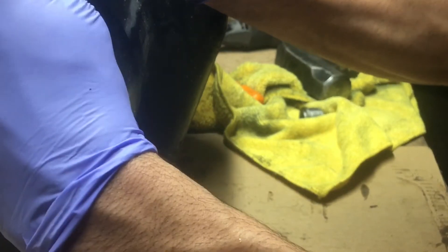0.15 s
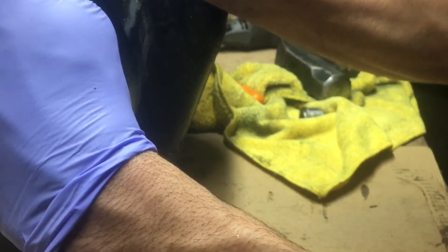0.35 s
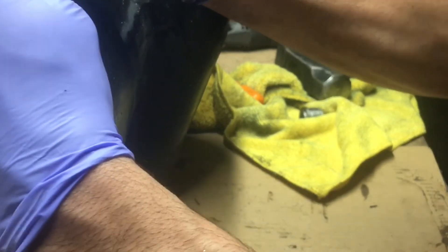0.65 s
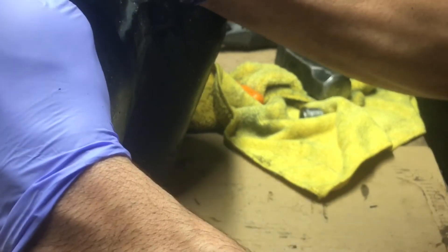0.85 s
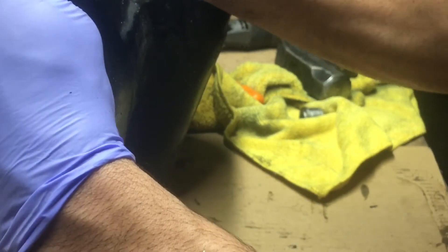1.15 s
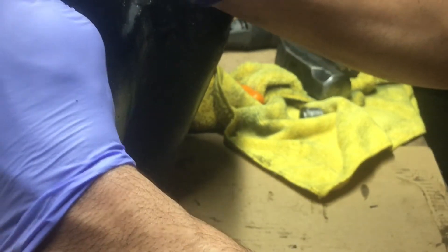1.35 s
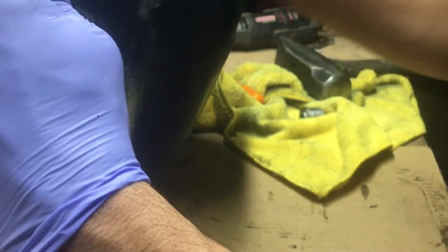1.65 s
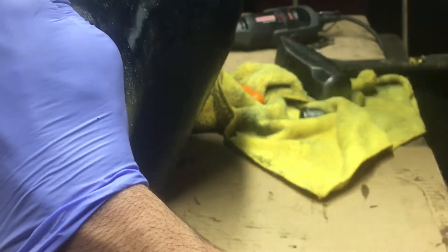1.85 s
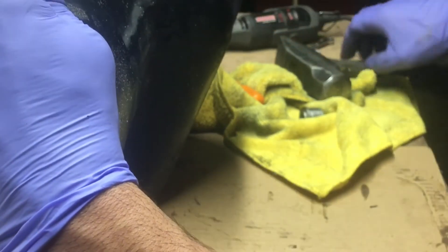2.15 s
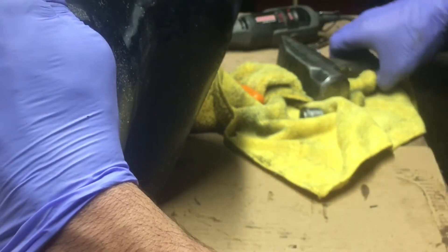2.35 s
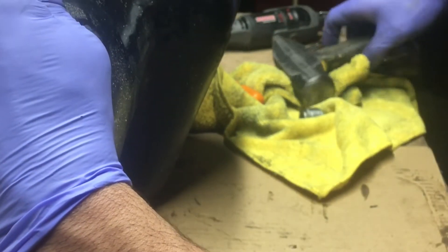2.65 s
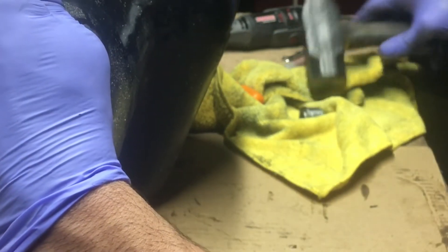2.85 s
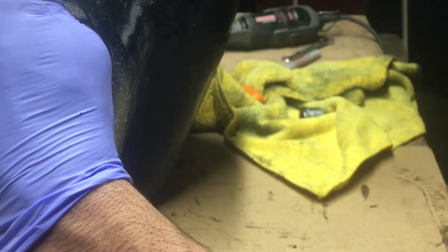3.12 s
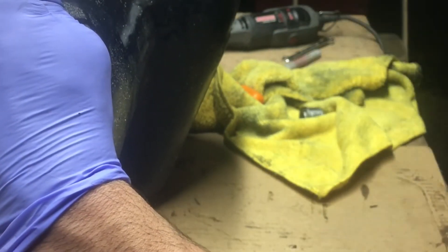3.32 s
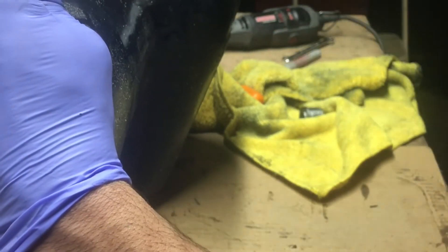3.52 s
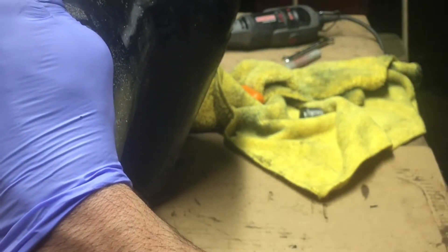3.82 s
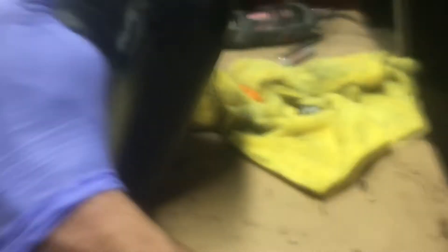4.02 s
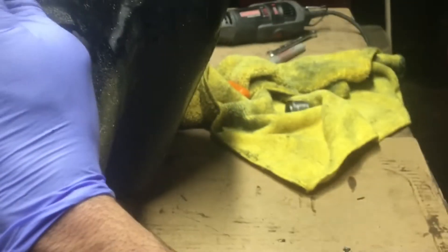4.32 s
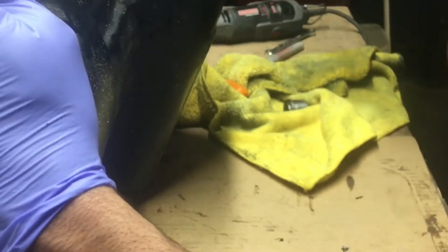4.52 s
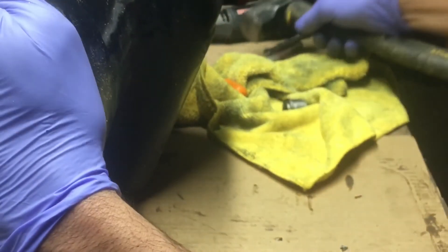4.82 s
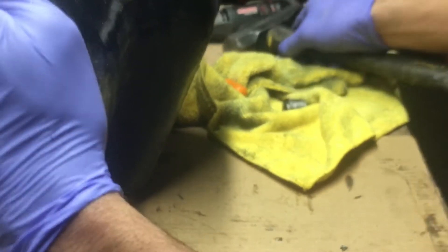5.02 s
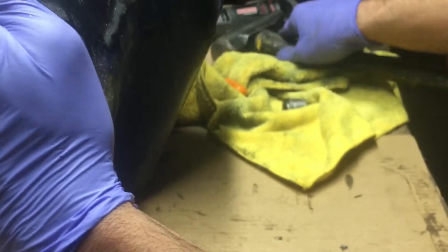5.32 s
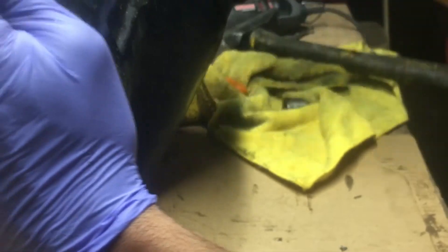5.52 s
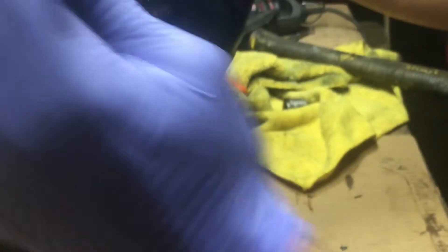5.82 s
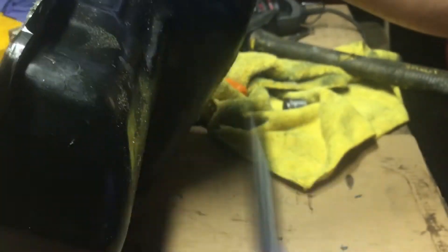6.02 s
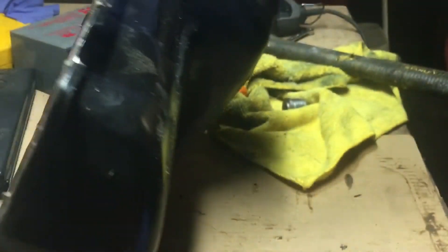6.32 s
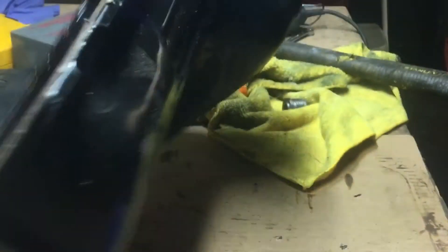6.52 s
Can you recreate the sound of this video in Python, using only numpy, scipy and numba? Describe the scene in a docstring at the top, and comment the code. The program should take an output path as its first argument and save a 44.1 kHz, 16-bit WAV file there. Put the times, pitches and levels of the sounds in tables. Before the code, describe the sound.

Faint rubbery rustles over low shop rumble, a sudden loud metallic crash with short ring, then heavy tool clacks, scrapes and bench thumps.

```python
"""A steel oil pan on a workshop bench, heard close by: one hard hammer blow rings its decaying modes.
Gloved hands shift a punch on it before; then the hammer is laid down and pan and tools knock about.
Impacts are sums of damped sines and banded noise; scrapes and rustling are noise under moving gains.
A filtered-noise rumble fills the shop and the walls echo the bench.
The phone turns down after loud sounds and limits the peaks."""
import sys
import numpy as np
from scipy import signal
from scipy.fft import rfft, irfft, next_fast_len
from scipy.io import wavfile
from scipy.ndimage import uniform_filter1d
from numba import njit

SR = 44100
rng = np.random.default_rng(int(sys.argv[2]) if len(sys.argv) > 2 else 0)


def store_wav(level_fs):
    """Save 16-bit WAV to argv[1]."""
    pcm = np.round(np.clip(np.atleast_2d(level_fs), -1, 1) * 32767)
    wavfile.write(sys.argv[1], SR, pcm.T.astype(np.int16))


N = 293617


def undb(db):
    """Logarithmic level: decibels to amplitude gain."""
    return 10 ** (np.asarray(db) / 20)


def level(x, db):
    """Mean power: scale a signal to an rms level."""
    return x * undb(db) / np.sqrt(np.mean(x ** 2))


def peak(x, db):
    """Peak amplitude: scale a signal to a peak level."""
    return x * undb(db) / np.max(np.abs(x))


def unit_energy(x):
    """Energy normalization: scale the sum of squares to 1."""
    return x / np.sqrt(np.sum(x ** 2))


def add(out, s, sound):
    """Superposition: mix a sound in at a time in seconds."""
    i = int(s * SR)
    out[i:i + len(sound)] += sound[:N - i]


def spectrum_bins(size):
    """Discrete spectrum: bin frequencies in Hz, at least 1 so that logarithms exist."""
    return np.maximum(np.arange(size // 2 + 1) * SR / size, 1)


def coloured(x, points):
    """Linear filtering: shape a spectrum by (frequency [Hz], gain [dB]) points."""
    hz, db = np.transpose(points)
    size = next_fast_len(len(x))
    gain = undb(np.interp(np.log(spectrum_bins(size)), np.log(hz), db))
    return irfft(rfft(x, size) * gain, size)[:len(x)]


def walk(rate):
    """Random modulation: levels held 1 / rate seconds, smoothed twice, with a spread near 1."""
    k = int(SR / rate)
    steps = np.repeat(rng.standard_normal(N // k + 1), k)
    return 1.3 * uniform_filter1d(uniform_filter1d(steps, k), k)[:N]


def stroke(s, db, rise_s, hold_s, fall_s):
    """Exponential envelope: a movement's gain swells, holds and dies away evenly in dB."""
    t = np.arange(N) / SR - s
    # distance from full contact, in steps of 20 dB; times below 1 ms act as 1 ms
    before = np.maximum(-t / max(rise_s, 1e-3), 0)
    after = np.maximum((t - hold_s) / max(fall_s, 1e-3), 0)
    return undb(db - 20 * np.minimum(before + after, 10))


def favour(f, hz, octaves):
    """Contact spectrum: a contact drives the frequencies near hz best (dB)."""
    return -6 * (np.log2(f / hz) / octaves) ** 2


def ring(modes, hz, octaves, free, scatter_db, seconds):
    """Modal superposition: damped sines of total energy 1, at new strengths for each blow."""
    f, db, t60 = np.transpose(modes)[:, :, None]
    chance = rng.standard_normal((len(f), 2, 1))
    gain = undb(db + scatter_db * chance[:, 0] + favour(f, hz, octaves))
    polarity = np.sign(chance[:, 1])
    t = np.arange(int(seconds * SR)) / SR
    decay = np.exp(-np.log(1000) * t / (t60 * free))
    return unit_energy(np.sum(gain * polarity * np.sin(2 * np.pi * f * t) * decay, axis=0))


# centres of the overlapping decay bands [Hz], 0.6 octave apart
BANDS_HZ = 50 * 2 ** np.arange(0, 8.4, .6)[:, None]


def crowd(points, hz, octaves, free, seconds):
    """High modal density: noise of energy 1 whose narrow bands each die at their own rate."""
    size = next_fast_len(int(seconds * SR))
    f, db, t60 = np.transpose(points)
    bins = spectrum_bins(size)
    strength = np.interp(np.log(bins), np.log(f), db, left=-60) + favour(bins, hz, octaves)
    noise = rfft(rng.standard_normal(size)) * undb(strength)
    masks = np.clip(1 - np.abs(np.log2(bins / BANDS_HZ)) / .6, 0, 1)
    t60_s = np.interp(np.log(BANDS_HZ), np.log(f), t60) * free
    decay = np.exp(-np.log(1000) * np.arange(size) / SR / t60_s)
    return unit_energy(np.sum(irfft(noise * masks, size) * decay, axis=0)[:int(seconds * SR)])


@njit
def limiter(x, top, ratio, attack, release, ahead):
    """Dynamic compression: an envelope follower lowers the gain above a threshold.

    Attack and release are the follower's shares per sample; ahead is in samples.
    """
    y, e = np.empty(len(x)), 1e-9
    for i in range(len(x)):
        a = abs(x[min(i + ahead, len(x) - 1)])
        e += (a - e) * (attack if a > e else release)
        y[i] = x[i] * min(1., top / e) ** (1 - 1 / ratio)
    return y


# background spectrum: (frequency [Hz], relative level per Hz [dB])
SHOP_SPECTRUM = [(12, -41), (20, -7), (81, 2), (124, -6.5), (163, -5), (188, -9.5), (210, -17),
                 (311, -23.5), (339, -24.5), (928, -31), (2280, -42), (2550, -49.5), (7380, -52.5),
                 (9500, -51), (16200, -72)]
SHOP_DB = -45.5  # rms


def shop():
    """Stationary noise, slightly modulated: steady rumble and faint hiss, swelling a little."""
    rumble = coloured(rng.standard_normal(N), SHOP_SPECTRUM)
    return level(rumble * undb(1.2 * walk(3)), SHOP_DB)


# reverberation of the walls: (frequency [Hz], relative level [dB], t60 before scaling [s])
ROOM_DECAY = [(63.5, 14, 0.35), (247, 4.5, 0.64), (950, 0, 0.67), (3060, -6, 0.79), (7820, -10, 0.97),
              (15000, -4, 0.11)]
ROOM_DB, ROOM_DELAY_S = -13, .004


def echo(near):
    """Diffuse reverberation: convolve the bench with delayed, decaying noise from the walls."""
    tail = crowd(ROOM_DECAY, 1000, 20, 0.82, 0.92)
    walls = np.append(np.zeros(int(ROOM_DELAY_S * SR)), tail)
    return undb(ROOM_DB) * signal.fftconvolve(near, walls)[:N]


# spectrum of rubbing gloves and rag: (frequency [Hz], relative level per Hz [dB])
CLOTH_SPECTRUM = [(880, -47), (1500, -8), (2940, -5.5), (3880, 0), (4870, -8), (5330, -2.5), (11200, -6),
                  (16000, -11)]
# movements of gloves and rag: (time of the loudest moment [s], level [dB], 20 dB rise time [s],
# 20 dB fall time [s], treble gain [dB]); times too short, or negative, are raised to a minimum
RUSTLE_MOVES = [(.06, -75, -0.1, 0.4, 0), (.31, -65.5, 0, -0.03, -12), (0.472, -40.5, 0.0357, 0.1043, -2.5),
                (.82, -66.5, 0.07, 0.03, -14), (1.26, -52.5, 0.07, 0.15, -2), (1.38, -63.5, 0.03, -0.17, 3),
                (1.63, -68.5, 0.48, 0, 2), (1.76, -68, 0, 0.37, -2), (1.86, -67, -0.1, 0, -3),
                (1.93, -68, -0.04, 0, 0), (2.09, -65, -0.06, 0.18, 0), (2.295, -63.5, -0.1, 0.2, 4),
                (2.57, -65.5, 0.07, 0.16, 0), (2.72, -65, 0.33, 0.2, -3), (3.07, -55.5, 0.08, 0.16, 4),
                (3.205, -54.5, 0.06, 0.13, 0), (4.52, -62.5, -0.02, 0.2, -8.5),
                (4.664, -62, 0.04, -0.25, -8.5), (4.73, -67, -0.16, 0.5, -8), (4.9, -49, 0.06, -0.14, -7),
                (5.06, -53, 0.15, -0.04, -2), (5.296, -54, 0.26, 0.1, -5.5), (5.41, -65, 0.07, 0.4, 2),
                (5.552, -36.5, 0.0445, 0.02, -21), (5.71, -54, -0.26, -0.06, -6),
                (5.768, -58, -0.24, 0.13, -12), (5.82, -52, 0.08, 0.1, 0), (6.0, -70.5, -0.2, .8, -7.5),
                (6.3, -58.5, 0.24, 0.4, 1), (6.528, -50.5, 0.1, -0.05, 1)]
RESTLESS_DB, RESTLESS_SWING_DB = -81, 3  # the hands are never quite still
QUICKEST_SWELL_S, TREBLE_HZ = .045, 10000


def rustle():
    """Stick-slip friction: dense tiny slips of rubber and cloth, some movements crisper than others."""
    slips = rng.standard_normal(N) * undb(2.3 * walk(340) + 1.5 * walk(40))
    cloth = level(coloured(slips, CLOTH_SPECTRUM), 0)
    treble = coloured(cloth, [(.9 * TREBLE_HZ, -60), (1.1 * TREBLE_HZ, 0)])
    out = cloth * undb(RESTLESS_DB + RESTLESS_SWING_DB * walk(4.7))
    for s, db, rise, fall, treble_db in RUSTLE_MOVES:
        move = stroke(s, db, max(rise, QUICKEST_SWELL_S), 0, fall)
        out += move * (cloth + (undb(treble_db) - 1) * treble)
    return out


# dry clack of tools: (frequency [Hz], relative level [dB], t60 of a free ring [s])
CLACK_MODES = [(500, 25.5, 0.03), (1970, -1, 0.075), (3500, -3.5, 0.045), (6140, -10, 0.048),
               (15100, -23, 0.033)]
# clear modes of the steel tools: (frequency [Hz], mean relative level [dB], t60 of a free ring [s])
TOOL_MODES = [(1150, -3, .05), (1500, -5, .05), (1800, -3, .05), (2350, -3, .05), (2650, -4, .04),
              (2950, -4, .04), (3300, 0, .06), (3650, 0, .06), (4220, -1, .05), (4660, -6, .05),
              (5750, -6, .04), (6600, -9, .03)]
# tools ticking together: (time [s], peak level [dB], best-driven frequency [Hz], share of t60 left [0-1])
TOOL_TICKS = [(1.014, -59, 3050, 0.7), (2.024, -52, 3460, 0.06), (2.067, -47, 3590, 1),
              (2.096, -32, 2530, 0.25), (2.3466, -48.5, 2330, .6), (2.438, -46, 2430, 1),
              (3.1334, -60, 5500, .6), (3.2166, -57, 4040, .8), (4.4207, -17, 2500, 1),
              (4.9989, -13.5, 3240, 0.53), (5.006, -7, 4400, 0.38), (5.0547, -13, 4060, 0.34),
              (5.1239, -12.5, 2300, 0.54), (5.396, -35, 1980, 0.57), (5.454, -19, 3400, 0.42),
              (5.4778, -21.5, 2660, 1), (5.522, -21.5, 2200, 1), (5.5378, -17, 3470, 0.6),
              (5.62, -23, 3380, 0.17), (5.659, -28, 3270, 0.27), (5.7271, -14.5, 4050, 0.4),
              (5.7794, -41, 3330, .7), (5.794, -29, 2800, 0.6), (5.8444, -25.5, 4330, 0.65),
              (5.883, -32, 2303, 0.64), (5.909, -37, 4190, 0.3), (6.4577, -13.5, 3210, 0.27),
              (6.498, -30, 3400, 0.32), (6.5244, -38, 5750, 0.55)]
STEEL_DB = -2  # clear ring relative to the clack


def tools():
    """Impact of small solids: short dry clacks with a steel ring, built up by a brief contact."""
    out = np.zeros(N)
    contact = 1 - np.exp(-np.arange(int(.1 * SR)) / SR / .0006)  # time constant 0.6 ms
    for s, db, hz, free in TOOL_TICKS:
        steel = ring(TOOL_MODES, hz, .6, free, 2.5, .1)
        clack = crowd(CLACK_MODES, hz, 1.3, free, .1)
        add(out, s, peak(contact * (clack + undb(STEEL_DB) * steel), db))
    return out


# modes of the bench top: (frequency [Hz], mean relative level [dB], t60 of a free ring [s])
BENCH_MODES = [(50.6, -9.5, .15), (75.1, -0.5, 0.19), (98.15, -3.5, .2), (140, 0, .2), (197.8, -8.5, .18),
               (236.3, -8.5, .12), (278, -3.5, .14), (308.7, 0.5, .14), (368.1, 1.5, 0.16), (421, -3, .1),
               (474, -2, 0.11), (626, -5, 0.24), (890, -9, 0.071), (1200, -11, .05)]
# heavy contacts: (time [s], peak level [dB], best-driven frequency [Hz], share of t60 left [0-1])
BENCH_THUDS = [(.787, -37, 446, 0.6), (0.925, -39, 427, 0.53), (2.091, -39, 111, 1), (2.439, -42, 330, 1),
               (3.978, 0, 148.6, 0.16), (3.989, 2, 343, 0.8), (3.996, -4, 140, 0.52),
               (4.012, -0.5, 85, 0.27), (4.424, -28, 480, 0.9), (5.004, 1, 384, 0.4), (5.051, -6, 427, 0.3),
               (5.075, -16, 320, 0.3), (5.129, -17.5, 92, 0.77), (5.399, -25.5, 84, 1.0),
               (5.468, -23.5, 94, 0.93), (5.548, -14.5, 384, 0.37), (5.722, -6.5, 453, 0.22),
               (5.762, -20.5, 81, 1.0), (5.837, -11, 473, 0.28), (5.989, -29, 79, 0.63),
               (6.19, -7.5, 415, 0.46), (6.197, -15.5, 114, 0.2), (6.46, -11.5, 178, 0.33),
               (6.473, -16.5, 88, 0.22), (6.5, -26, 88, 0.7), (6.59, -28.5, 75, 0.9)]


def bench():
    """Forced response: heavy contacts shake the padded bench; a duller one pushes for longer."""
    out = np.zeros(N)
    for s, db, hz, free in BENCH_THUDS:
        push = np.hanning(int(.6 * SR / hz))
        shake = ring(BENCH_MODES, hz, .75, free, 1.5, .4)
        add(out, s, peak(np.convolve(shake, push), db))
    return out


# clear modes of the pan: (frequency [Hz])
PAN_HZ = [447, 749, 889, 960, 1071, 1182, 1260, 1394, 1453, 1692, 1820, 1970, 2192, 2283, 2488, 2619, 3107,
          3360, 3421, 3563, 3677, 3994, 4242, 5254, 5448, 5640, 5992, 7300, 7483, 9615]
# how each of them rings: (mean relative level [dB], t60 of a free ring [s])
PAN_DECAY = [(10.5, 0.25), (-9.5, 0.67), (-4, 0.34), (-2, 0.29), (-10.5, 0.15), (-3, 0.24), (-2, 0.45),
             (-2, 0.37), (-6.5, 0.19), (-1, 0.33), (-13, 0.21), (-17, 0.79), (-0.5, 0.36), (-6, 0.32),
             (-6, 0.41), (-2.5, 0.39), (-8.5, 0.7), (-18.5, 0.35), (-16.5, 0.75), (-17, 0.21), (-6, 0.14),
             (-10, 0.89), (-14, 0.65), (-12, 0.7), (-12, 0.55), (-11, 0.4), (-17, 0.72), (-5, 0.29),
             (-16, 0.21), (-11, .25)]
# lesser modes, too close to tell apart: (frequency [Hz], relative level [dB], t60 of a free ring [s])
SHEET_MODES = [(248, -1.5, 0.23), (400, 5, 0.69), (601.5, 2.5, .5), (1030, 1, 0.3), (1400, -3.5, .5),
               (2307, -8, 0.75), (2870, -15, 0.6), (3126, -4, 0.59), (3440, -5.5, .6), (3790, -14.5, .6),
               (4140, -6, 0.67), (4450, -8.5, .6), (4900, -21.5, .6), (5330, -8.5, 0.5), (5950, -11, .5),
               (6300, -18, 0.45), (7000, -9, 0.74), (8300, -15, 0.52), (8900, -6.5, 0.16),
               (15530, -16.5, .2)]
# blows: (time [s], peak level [dB], best-driven frequency [Hz], contact width [octaves],
# shares of t60 that the gripping hand leaves to the crash and to the clear modes [0-1],
# clear modes relative to the crash [dB])
BLOWS = [(.794, -35.5, 685, 1.35, 0.26, .4, -24), (3.963, -20, 4000, 4.2, 0.6, 0.37, -11),
         (3.985, 8, 4700, 1.62, 0.45, 0.5, -1.5), (3.989, -1.5, 915, 0.26, 0.97, 0.8, 18),
         (4.009, 7.5, 2970, 1.17, 0.37, 0.52, -9), (4.02, 2.5, 1540, 2.8, 0.23, 0.47, 1.5),
         (4.422, -13.5, 1727, 0.65, 0.32, 0.48, 2), (5.001, -13.5, 1340, 1.46, 0.53, 0.67, -5),
         (5.123, -22, 2140, 1.17, 0.57, 0.93, -14), (5.722, -15.5, 1110, 1.94, 0.27, 0.78, -5),
         (6.192, -3.5, 1010, 0.81, 0.25, 0.17, -13), (6.192, -9.5, 3710, 1.16, 0.14, 0.15, -10),
         (6.458, -19.5, 1940, 2.6, 0.14, .5, -12)]
# steel dragged over the pan: (time of full contact [s], drive level [dB], hold [s], 20 dB fall time [s]);
# fall times below 1 ms, or negative, act as 1 ms
PAN_SCRAPES = [(0.455, -39.5, 0.056, 0.01), (1.238, -49, 0.037, 0.18), (3.4, -67, .12, -0.44),
               (4.5, -51.5, .03, 0.24), (4.62, -52.5, 0.041, 0.2), (4.85, -46.5, 0.057, 0.6),
               (5.298, -50.5, 0.0039, 0.13), (5.398, -50.5, .04, 0.3), (5.56, -38.5, .005, 0.1),
               (5.626, -37, 0.0032, 0), (5.65, -53, 0.054, -0.06), (5.748, -29, 0.0055, 0.08),
               (5.846, -36.5, 0.0021, .03), (5.884, -44.5, .003, .06)]
SCRAPE_RISE_S = 0.024  # the last 20 dB of the rise


def pan():
    """Modal vibration of a plate: blows and scrapes excite the same steel sheet."""
    out, modes = np.zeros(N), np.column_stack([PAN_HZ, PAN_DECAY])
    for s, db, hz, octaves, free, clear_free, clear_db in BLOWS:
        clear = ring(modes, hz, octaves, clear_free, 1.8, .8)
        crash = crowd(SHEET_MODES, hz, octaves, free, .8)
        add(out, s, peak(crash + undb(clear_db) * clear, db))
    grit = level(rng.standard_normal(N) * undb(2.0 * walk(150) + 1.6 * walk(29.26)), 0)
    drag = sum(stroke(s, db, SCRAPE_RISE_S, hold, fall) for s, db, hold, fall in PAN_SCRAPES)
    # hands hold the pan while the steel drags, so it rings only briefly
    held_sheet = crowd(SHEET_MODES, 1610, 0.86, .02, .2)
    held_clear = ring(modes, 1100, 1.56, 0.34, 1.2, .2)
    body = held_sheet + undb(-1.5) * held_clear
    return out + signal.fftconvolve(grit * drag, body)[:N]


def scene():
    """Superposition of sources: the bench, its echo from the walls and the background."""
    near = rustle() + tools() + bench() + pan()
    return (near + echo(near) + shop())[None]


BOTTOM_HZ, TOP_HZ = 43, 16300  # passband edges
DUCK_DB, DUCK_RATIO, DUCK_ATTACK_S, DUCK_RELEASE_S = -35.5, 1.156, 0.049, 0.45
LIMIT_DB, LIMIT_RATIO, ATTACK_S, RELEASE_S = -4, 8., 0.0011, 0.6


def record(dry):
    """Band-limiting and compression: the microphone drops the deepest bass; the phone tames loud sounds."""
    bass_cut = signal.butter(2, BOTTOM_HZ, "high", fs=SR, output="sos")
    heard = signal.sosfilt(bass_cut, dry[0])
    # turn down gently after loud sounds
    eased = limiter(heard, undb(DUCK_DB), max(DUCK_RATIO, 1.),
                    1 / (DUCK_ATTACK_S * SR), 1 / (DUCK_RELEASE_S * SR), ahead=0)
    # limit the peaks, looking a little ahead
    held = limiter(eased, undb(LIMIT_DB), LIMIT_RATIO,
                   1 / (ATTACK_S * SR), 1 / (RELEASE_S * SR), ahead=int(ATTACK_S * SR))
    clipped = np.clip(held, -1, 1)  # what slips past the limiter
    top_cut = signal.ellip(12, .2, 90, TOP_HZ, fs=SR, output="sos")
    return signal.sosfilt(top_cut, clipped)[None]


dry = scene()
out = record(dry)
store_wav(out)
```